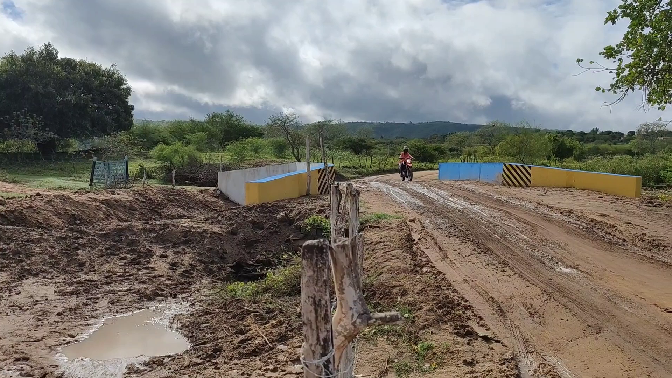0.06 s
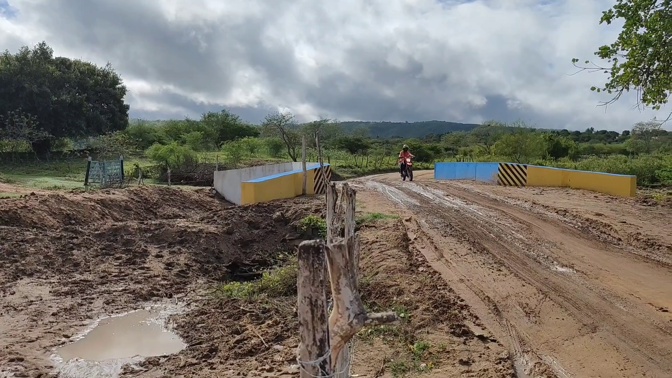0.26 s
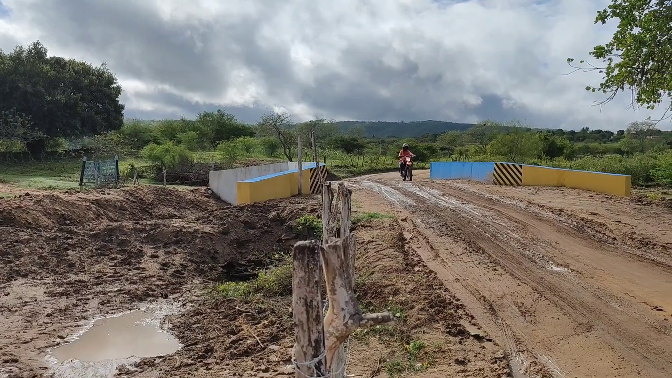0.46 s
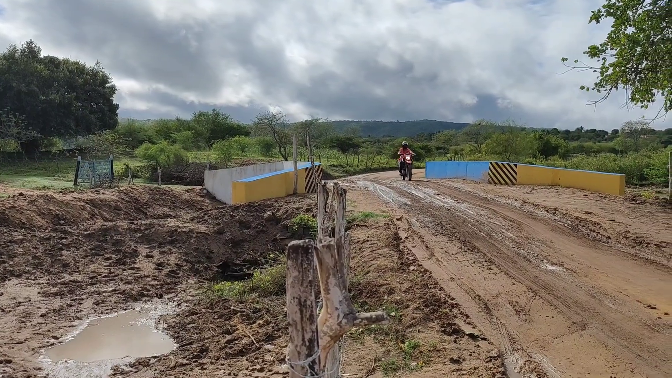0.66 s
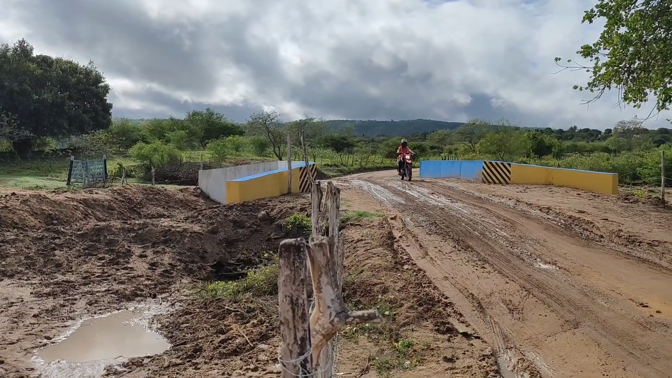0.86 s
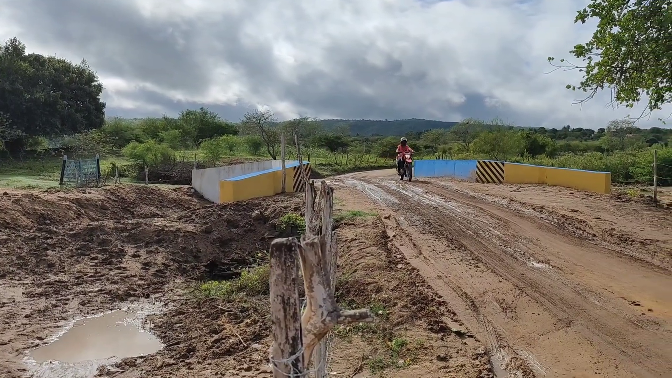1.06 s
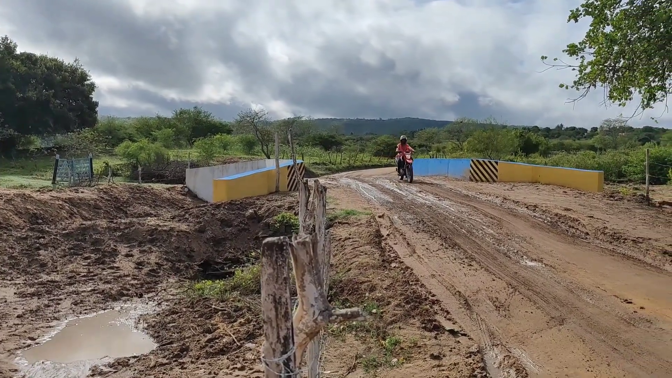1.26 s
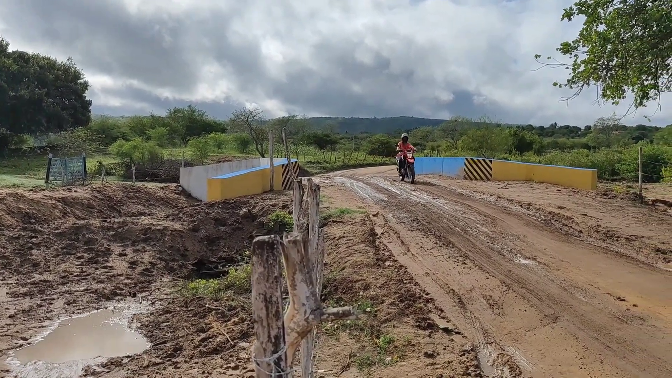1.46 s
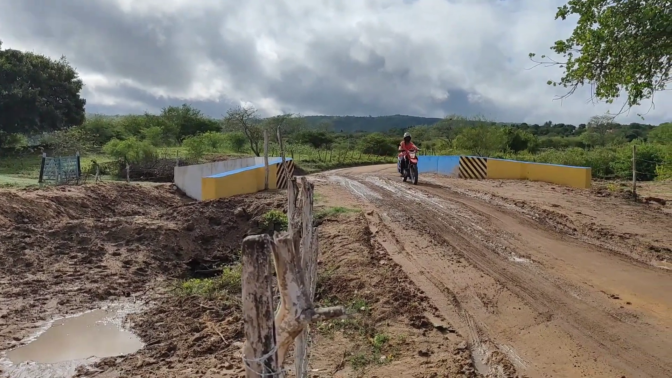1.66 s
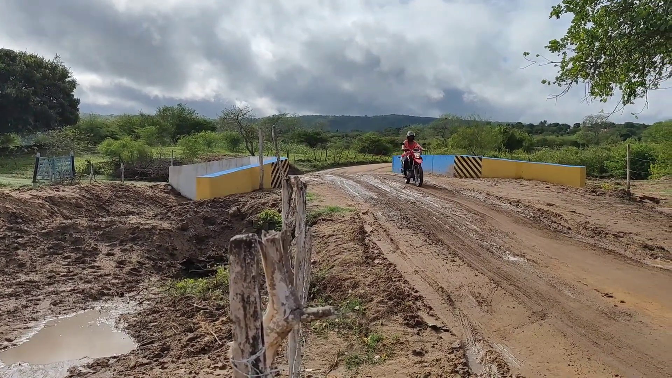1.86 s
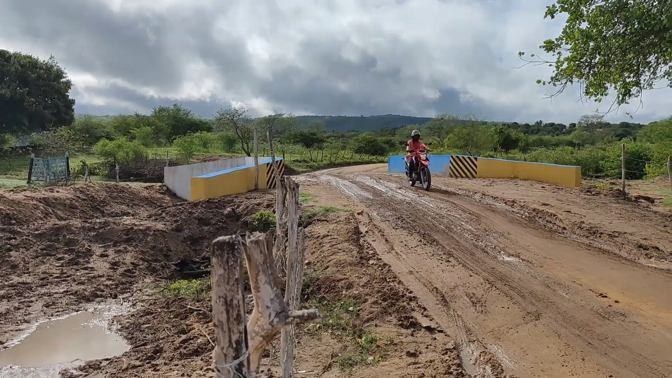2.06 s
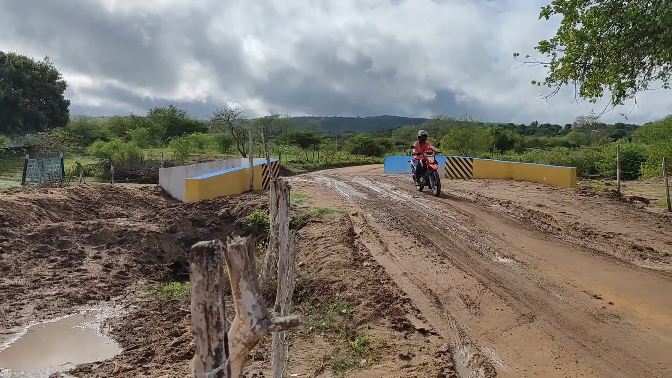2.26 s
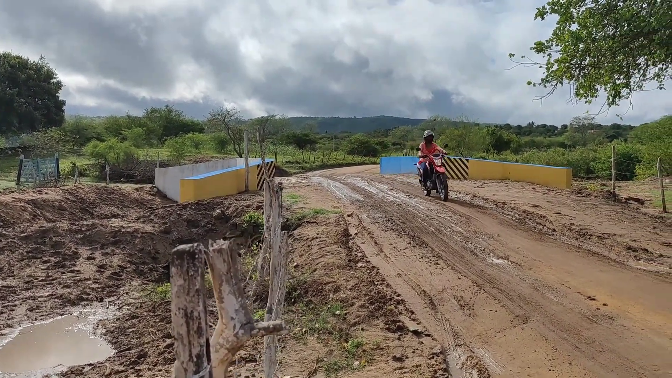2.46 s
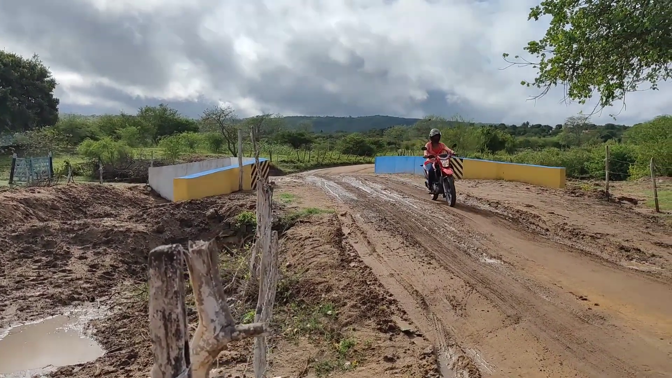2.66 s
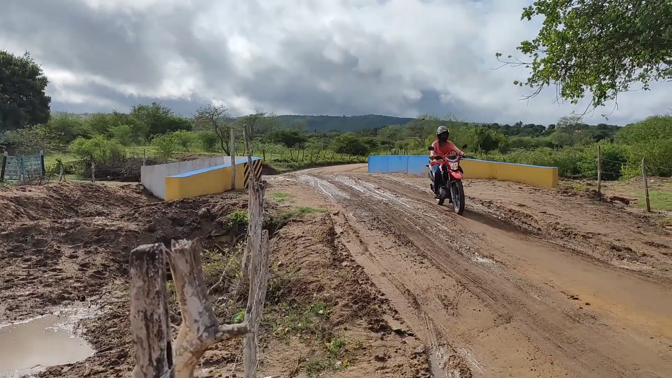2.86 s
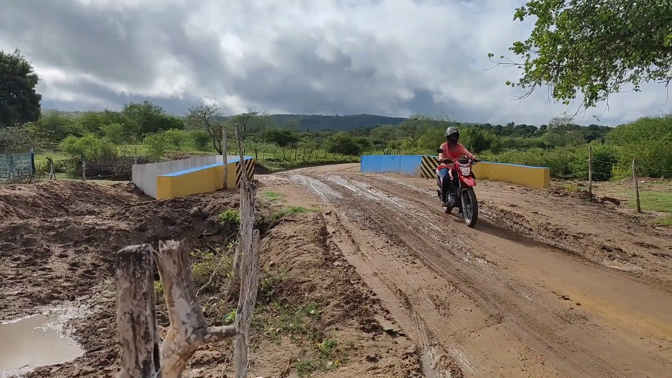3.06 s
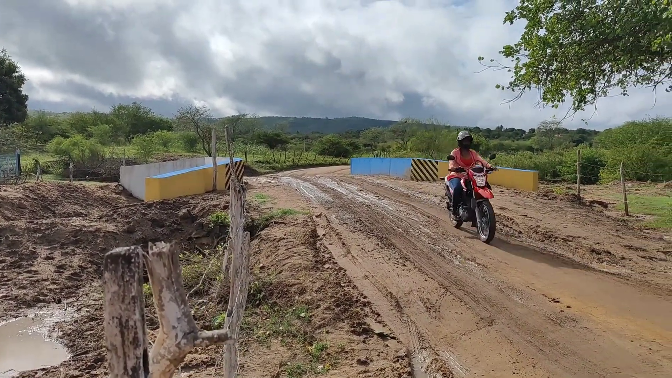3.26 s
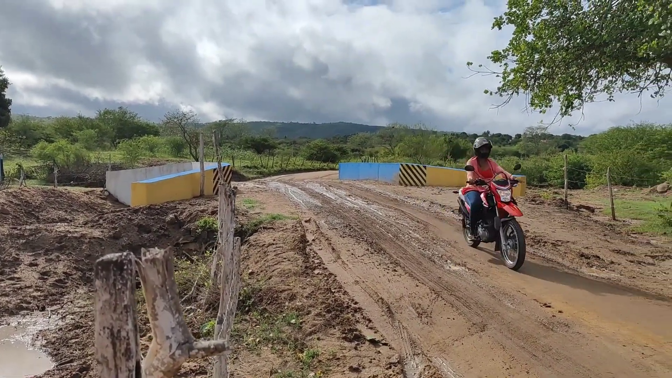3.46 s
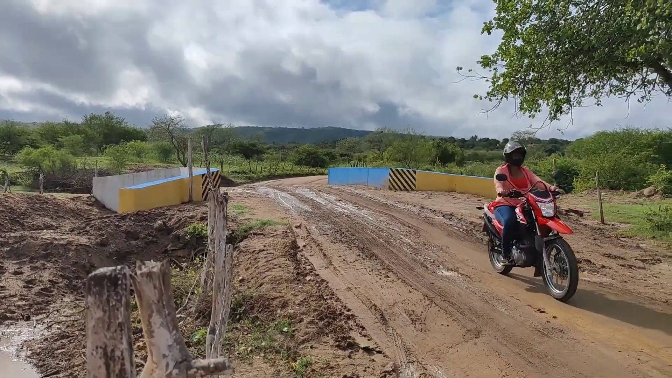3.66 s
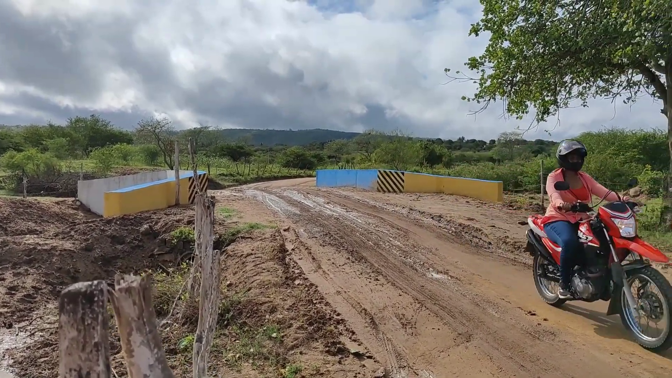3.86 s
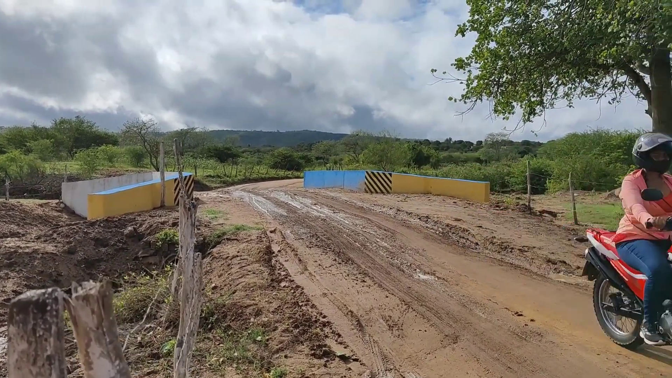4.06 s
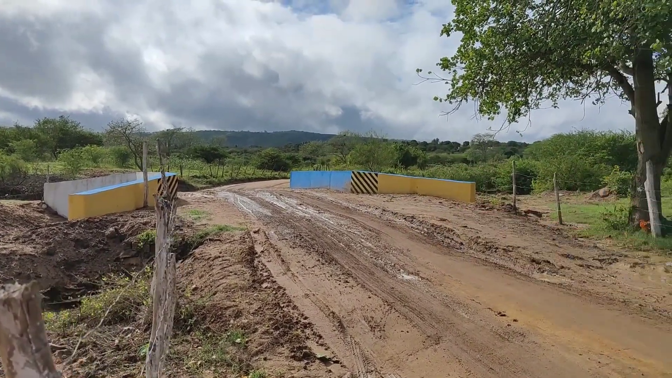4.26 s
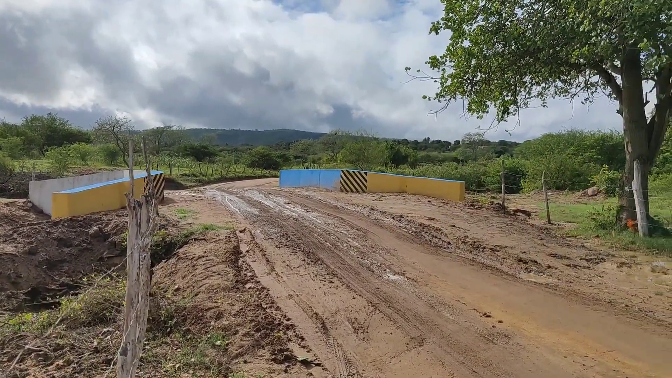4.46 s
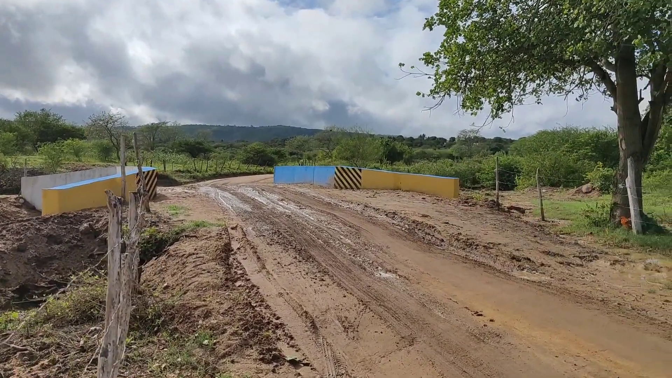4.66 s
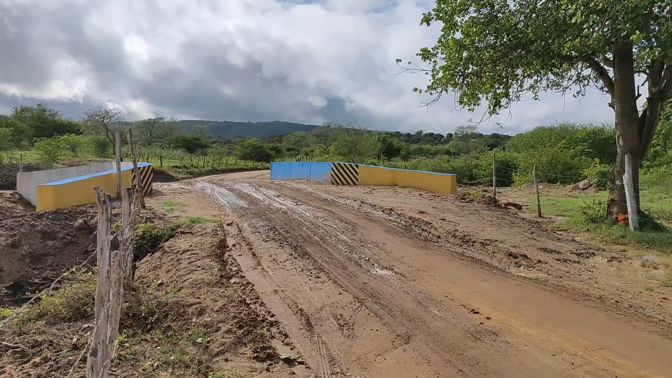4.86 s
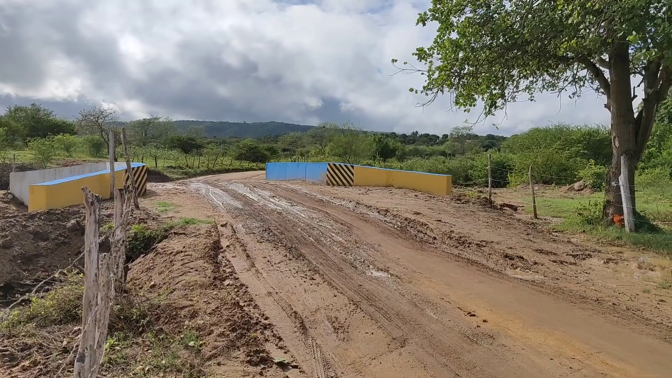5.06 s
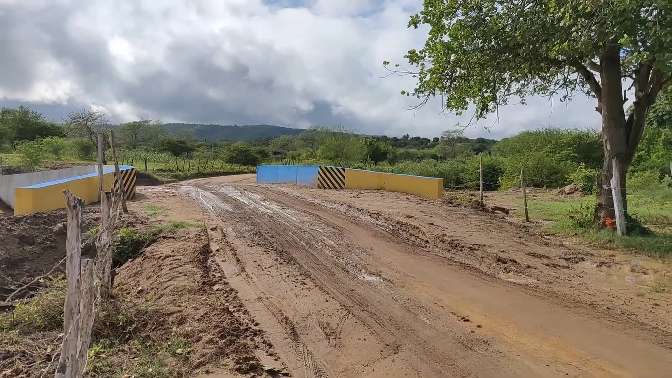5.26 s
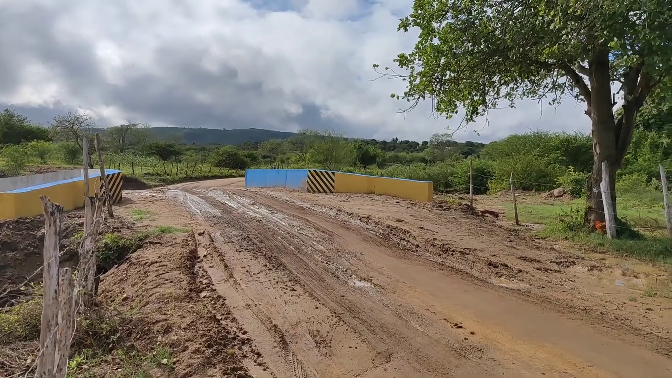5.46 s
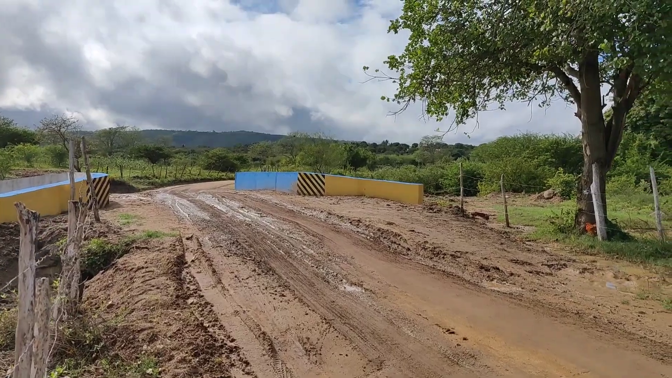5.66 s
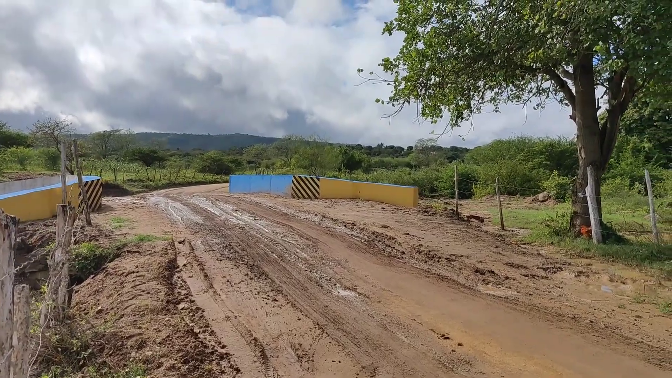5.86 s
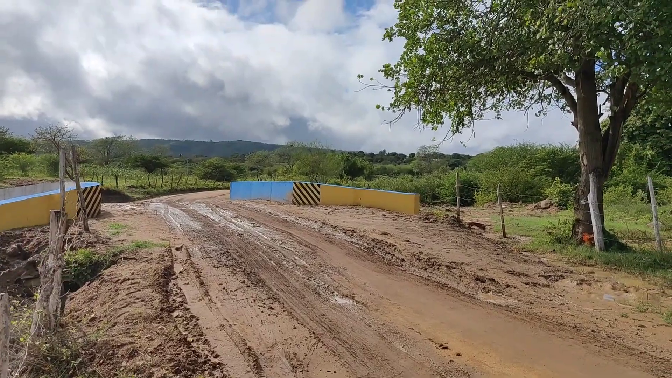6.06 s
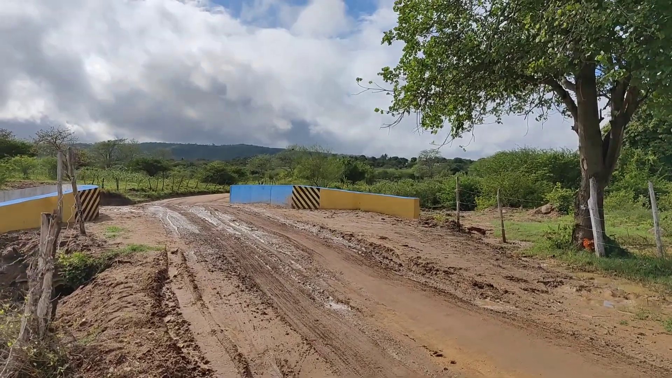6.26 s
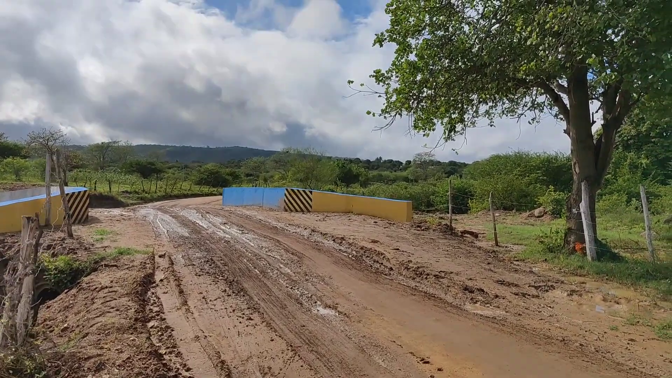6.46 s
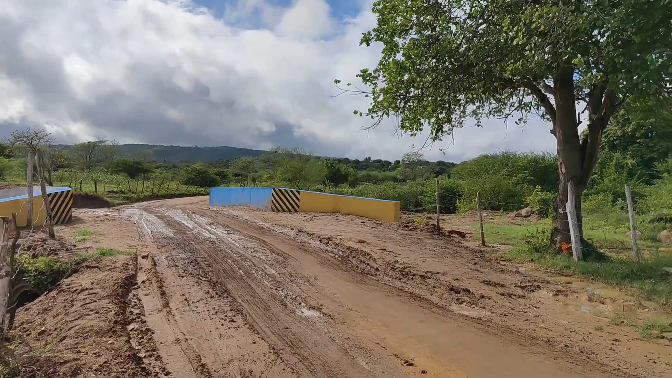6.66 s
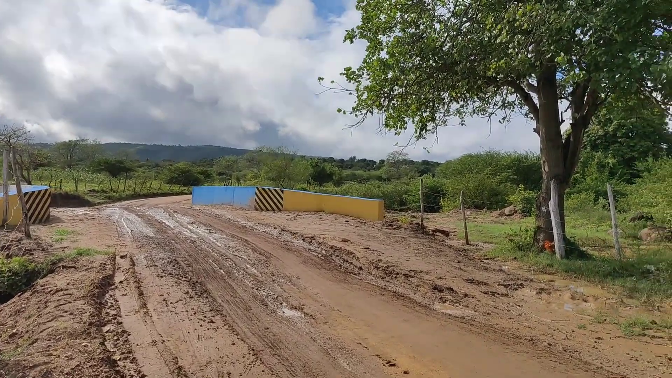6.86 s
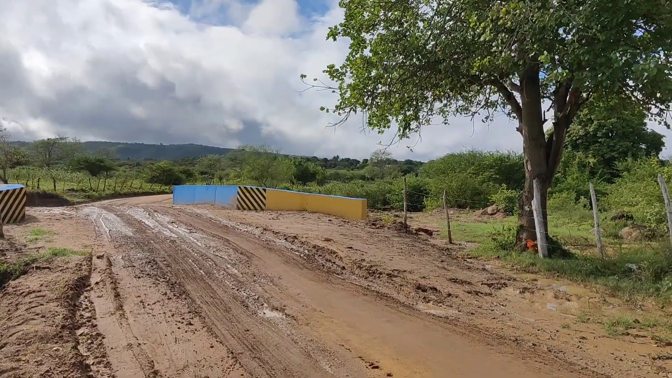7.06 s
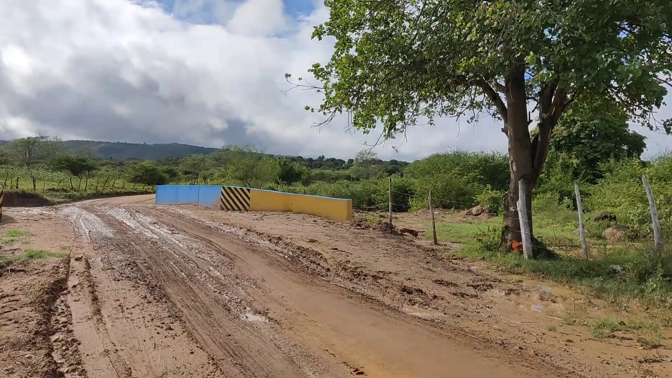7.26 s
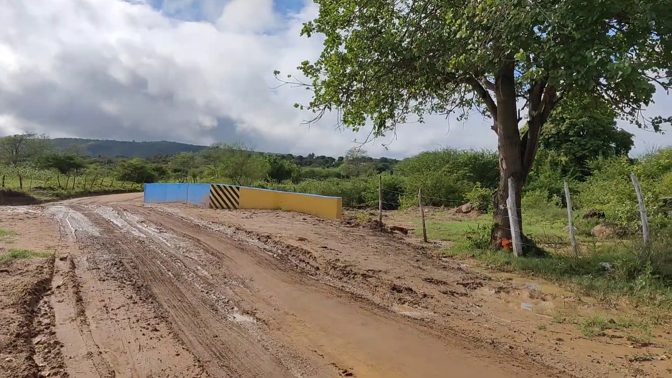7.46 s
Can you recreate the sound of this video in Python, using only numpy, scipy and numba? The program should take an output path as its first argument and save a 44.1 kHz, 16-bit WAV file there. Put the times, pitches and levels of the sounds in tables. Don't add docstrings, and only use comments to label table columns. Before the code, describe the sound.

Quiet open countryside, heard on a handheld stereo phone. A single-cylinder motorbike comes nearer, low thumping exhaust and gear hum growing; it lets off, shifts up, and accelerates past close by on the right with chain, valve and grit rasp. The tail pipe puffs and barks as it leaves, revs slowly rising while the sound thins. Low wind thuds buffet the microphones near the end, with a few tiny stone ticks.

```python
import sys
import numpy as np
from scipy import signal
from scipy.io import wavfile
from scipy.ndimage import uniform_filter1d, map_coordinates
from numba import njit

SR = 44100
rng = np.random.default_rng(int(sys.argv[2]) if len(sys.argv) > 2 else 0)


def pcm_store(signal):
    levels = np.round(np.clip(np.atleast_2d(signal), -1, 1) * 32767)
    wavfile.write(sys.argv[1], SR, levels.astype(np.int16).T)


def to_linear_factor(level_db):
    exponent = np.asarray(level_db, float) / 20
    return 10 ** exponent


N = 331411
KERB_M = 3.01

FACING_HZ = {"fins": (2070, 2100, 2280, 2180, 1950, 1990, 2010),
             "cover": (3400, 3300, 2820, 2670, 3160, 3140, 3100),
             "puff": (750, 765, 654, 595, 748, 626, 694), "case": (772, 1070, 970, 890, 830, 860, 840)}


def level(x, db):
    return x * to_linear_factor(db) / np.sqrt(np.mean(x ** 2))


def seconds():
    return np.arange(N) / SR


def curves(table):
    t_s, *columns = np.transpose(table)
    return [np.interp(seconds(), t_s, c) for c in columns]


@njit
def svf(x, hz, width):
    y, b, l = np.empty(len(x)), 0., 0.
    for i in range(len(x)):
        g, k = np.tan(np.pi * hz[i] / SR), width / hz[i]
        v = (b + g * (x[i] - l)) / (1 + g * (g + k))
        b, l, y[i] = 2 * v - b, l + 2 * g * v, k * v
    return y


def band(x, hz, width_hz):
    return svf(x, hz + np.zeros(N), 1. * width_hz)


def band_twice(x, hz, width_1_hz, width_2_hz):
    return band(band(x, hz, width_1_hz), hz, width_2_hz)


def ring(x, modes):
    return level(sum(to_linear_factor(db) * band(x, hz, w) for hz, w, db in modes), 0)


def late(x, samples):
    return map_coordinates(x, [np.arange(N) - samples], order=3, mode="nearest")


def noise():
    return rng.standard_normal(N)


def walk(rate_hz):
    k = int(SR / rate_hz)
    held = np.repeat(rng.standard_normal(N // k + 1), k)
    return 0.99 * uniform_filter1d(uniform_filter1d(held, k), k)[:N]


def road():
    speed_m_s, passes_s = 7.76, 4.54
    along_m = speed_m_s * (seconds() - passes_s)
    return np.hypot(along_m, KERB_M), np.degrees(np.arctan2(along_m, KERB_M))


def facing(values):
    aspects_deg = (-69, -41, 3.5, 41.5, 63.5, 77.5, 79.5)
    return np.interp(road()[1], aspects_deg, values)


def low_gear(start, top, clutch, bite=None):
    shift_s = (2.26, 2.35, 2.88, 3.0)
    bite = clutch if bite is None else bite
    return np.interp(seconds(), (0, *shift_s), (start, top, clutch, bite, 0))


def share_db(part):
    facing_db = {2: (-38, -35, -31, -29, -27.5, -27, -28), 3: (-41, -39, -32, -29, -32, -33, -42),
                 4: (-33, -34, -33, -29, -28, -27, -31), 5: (-33, -33, -32, -29, -27, -26.5, -34),
                 "rasp": (-31, -29, -26.5, -31, -36, -39, -48),
                 "clatter": (-15, -22, -10, -6.5, -9, -3, -9), "grit": (-13, -19, -19, -17, -21, -16, -11),
                 "fins": (-16, -13, -9, -10, -14, -3, 1.5), "bark": (-43, -38, -29, -25.5, -33, -27, -31),
                 "puff": (-37, -33, -35, -27.5, -33, -37, -35), "hum": (-47, -39, -47, -54, -55, -55, -55),
                 "case": (-41, -36, -44, -42, -51, -55, -46), "whine": (-60, -56, -53, -50, -43, -37, -37)}
    low_gear_db = {2: (-4, -1, 7, -7), 3: (7.5, 8.5, 10, 7.5), 4: (-1, -11, 4.5, -2),
                   5: (-5.5, -7, -2, -4.5), "rasp": (-2.5, 4, 1, -1.5), "clatter": (8, 5, 2.5, -1),
                   "grit": (6.9, 1.6, 1.3, 1.2), "fins": (12, -20, -44, -48), "bark": (6, 14.5, -9, -11),
                   "puff": (7.5, 7.5, 4.5, -2), "hum": (21.4, 12.6, 10.4, 3.7), "case": (4, 6.5, -6, 2),
                   "whine": (-7, -12, -7, -7)}
    return facing(facing_db[part]) + low_gear(*low_gear_db[part])


def heard_db(part):
    return share_db(part) - 20 * np.log10(road()[0] / KERB_M)


def crank(hz):
    return .56 + np.cumsum(hz) / SR


def exhaust(turns, behind):
    # [multiple, neighbour, front level/dB, rear level/dB re it]
    overtones = [(1, 2, -13, -13), (6, 5, -8, -6), (7, 5, -8, -11), (8, 5, -8, -18), (9, 5, -11, -21),
                 (10, 5, -14, -17), (11, 5, -18, -15), (12, 5, -19, -15)]
    meeting = {2: (-.22, -.12, -.05, -.05, -.08, -.1, -.08), 3: (.83, .45, .3, .27, .15, .05, 0),
               4: (.08,) * 7}
    db = {k: heard_db(k) for k in range(2, 6)}
    for k, near, front_db, rear_db in overtones:
        db[k] = db[near] + front_db + behind * (rear_db - front_db)
    db[7] = db[7] + low_gear(6, 2, 0)
    db[8] = db[8] + low_gear(4, 2, 0)

    delay, spread = low_gear(0, 0, -.35), low_gear(.11, .11, 0)
    skew = facing((.55, .55, .56, .55, .52, .51, .53)) + low_gear(.05, .05, -.24)
    meet = {k: facing(v) * (1 - low_gear(1.0, 0.92, 1)) for k, v in meeting.items()}
    note = 0
    for k in db:
        uneven_db = .8 * walk(12) + low_gear(3, 3, .5, .5) * walk(3)
        phase = k * (turns - delay) + skew + meet.get(k, 0) + spread * (k - 4) ** 2
        note = note + to_linear_factor(db[k] + uneven_db) * np.cos(2 * np.pi * phase)
    dip = 1 - .75 * np.exp(-((seconds() - 2.3) / .05) ** 2)

    flutter = ring(noise(), [(70.5, 13.0, -1.5), (120, 185, 0.43), (175, 90, 2)])
    flutter = flutter + to_linear_factor(-7.5 - 150 * behind) * ring(noise(), [(280, 140, 0)])
    flutter_db = uniform_filter1d(db[4] + db[5], SR // 2) / 2
    flutter_db = flutter_db - 0.5 - 1.0 * behind + low_gear(4.8, 13.6, 0.34)
    return np.sqrt(2) * dip * note + to_linear_factor(flutter_db) * flutter


def tail_pipe(turns, behind):
    # [f/Hz, width/Hz, level/dB]
    pipe_modes = [(363, 100, 13), (424, 63, 13.5), (550, 16, 7.5)]
    firings = np.diff((turns + .17).astype(int), prepend=0)
    knocks = level(firings * to_linear_factor(1.5 * walk(30)), 0)
    puffs = np.exp(-(((turns + .5) % 1 - .51) / .15) ** 2)
    gate = facing((1.6, 1.3, .9, .6, .6, 1.2, 1.6)) + puffs
    gas = gate / np.sqrt(uniform_filter1d(gate ** 2, SR // 5)) * noise()

    calm = facing((1, 1, 1, .9, .7, .6, .85))
    struck = facing((.5, 0.45, 0.85, 1.5, 0.8, 0.95, 0.8)) * knocks + calm * gas
    bark = ring(band(band(struck, 447, 270), 566, 330), pipe_modes)
    blown = gas + 0.33 * behind * late(knocks, 0.00399 * SR)
    puff = level(band_twice(blown, facing(FACING_HZ["puff"]), 126, 186), 0)
    return to_linear_factor(heard_db("bark") - 5.5) * bark + to_linear_factor(heard_db("puff") - 2.0) * puff


def running_gear(turns, metres, top):
    # [f/Hz, width/Hz, level/dB]
    casing_modes = [(1900, 46, 7.5), (2220, 440, 5.5), (3060, 1200, 2), (3150, 2700, 2.5),
                    (3980, 770, -6.5), (5820, 3700, 7), (7410, 800, -1.5)]
    cover_db = (-19.5, -14.5, -11.5, -14, -17.5, -33, -19)
    low_db, grit_db, fin_db = share_db("clatter"), share_db("grit"), share_db("fins")
    fin_hz, cover_hz = facing(FACING_HZ["fins"]), facing(FACING_HZ["cover"])
    hollow = facing((.7, .45, .2, .25, .35, .25, .2))
    shade = facing((0.11, 0.32, 0, 0.47, 0.59, 0.51, 0))
    cycle = np.cos(2 * np.pi * (turns - .02))
    valve = np.exp(-((turns - .62) % 1) / .14)
    beat = 1 + facing((0.03, 0.06, 0.12, .25, 0.3, 0.3, 0.15)) * cycle
    beat = beat + facing((.25, .8, .25, .1, 0, 0, 0)) * valve
    strength = to_linear_factor(heard_db("rasp")) * level(beat, 0) * to_linear_factor(.6 * walk(16))
    far = np.clip(metres / 12, .15, 1)
    rattle = to_linear_factor(2.2 * np.array([walk(17) for _ in range(len(casing_modes) + 2)]))

    ways = []
    for way in range(3):
        bursts = np.minimum(rng.exponential(size=N // 20 + 1), 4).repeat(20)[:N]
        hits = noise() * to_linear_factor(1.6 * bursts)
        clatter = ring(band(hits, 1055, 700), [(930, 230, -1.0), (1390, 62, 1.0), (1790, 320, 6.0)])
        low = to_linear_factor(low_db) * rattle[-1] * clatter
        fins = to_linear_factor(fin_db) * level(band_twice(hits, fin_hz, 750, 1200), 0)
        fins = fins + to_linear_factor(facing(cover_db)) * level(band_twice(hits, cover_hz, 600, 1000), 0)
        modes = zip(rattle, casing_modes)
        casing = level(sum(r * to_linear_factor(db) * band(hits, hz, w) for r, (hz, w, db) in modes), 0)
        grit = level(band(band(hits, 9670, 5600), 16400, 11400), 0)
        grit = to_linear_factor(grit_db) * rattle[-2] * grit
        grit = grit * (far if way == 0 else np.sqrt(1 + 1.3 * (1 - far ** 2)))
        high = casing + grit - 0.071 * band(casing, 2710, 170)
        high = high - hollow * (band(high, 4750, 750) + .5 * band(high, 10800, 1500))
        high = high - shade * band(high, 11900, 10400)
        ways.append(((strength + top) * (low + fins), (strength + .45 * top) * high))
    return ways


def gears(hz, turns):
    # [t/s, teeth met per firing, change level/dB]
    hum_track = [(0, 32.9, 0), (1.128, 32.9, 0), (1.137, 32.9, 6), (1.155, 32.9, -3), (1.175, 32.9, 6),
                 (1.19, 33, 0), (1.3, 33.6, 0), (1.39, 31.6, 3), (1.6, 34.7, 1), (1.82, 33.4, 0),
                 (2.02, 31.4, 1), (2.15, 31, -3), (2.33, 33, -9), (2.41, 34, 4), (2.57, 34, 6),
                 (2.63, 33.8, -8), (2.86, 35, -8), (2.9, 35, 6), (2.95, 38.5, 6), (3.02, 36, 0),
                 (3.3, 33.2, 0), (7.51, 33.2, 0)]
    whine_order, whine_fades_s = 47.8, 5.9
    order, change_db = curves(hum_track)
    hum_hz, hum_db = order * hz, heard_db("hum") + change_db
    swell = 1 + .3 * np.cos(2 * np.pi * (turns - .2))

    teeth = np.sqrt(2) * np.sin(2 * np.pi * np.cumsum(hum_hz) / SR + 1.1 * walk(40))
    hum = .7 * teeth + level(band_twice(noise(), hum_hz, 60, 110), -3)
    case = level(band_twice(noise(), facing(FACING_HZ["case"]), 350, 340), 0)
    whine = np.sqrt(2) * np.sin(2 * np.pi * whine_order * turns + 2.2 * walk(50))
    whine = whine * to_linear_factor(2.5 * walk(25)) * swell ** 2
    whine_db = heard_db("whine") - 30 * np.clip((seconds() - whine_fades_s) / 0.5, 0, 1) ** 2
    return swell * (to_linear_factor(hum_db) * hum + to_linear_factor(heard_db("case")) * case + to_linear_factor(whine_db) * whine)


def jolts():
    # [t/s, peak level/dB, thud share/dB, length/s]
    bumps = [(0.966, -52, 7, 0.0095), (1.14, -71, -7, 0.0091), (1.382, -51, -6, 0.021),
             (1.66, -43, -5, 0.05), (1.872, -38, 10, 0.014), (2.107, -43, -5, 0.0063),
             (2.151, -35, 9, 0.0093), (2.927, -44, 12, 0.052), (3.005, -32, 8.5, 0.025),
             (4.222, -41, 21, 0.011), (4.548, -19.5, -28, 0.0051), (5.363, -39, -3, 0.018),
             (5.87, -52, 28, 0.025), (6.98, -50, 22, 0.02)]
    t, top, thud = seconds(), 0, 0
    for t_s, db, thud_db, length_s in bumps:
        shape = np.exp(-((t - t_s - .008) / length_s) ** 2)
        top = top + to_linear_factor(db - 4.5) * shape
        thud = thud + to_linear_factor(db + thud_db - 14.5) * shape
    return top, thud


def clank():
    # [t/s, length/s, f/Hz, level/dB]
    panel = (7.035, 0.18, 1700, -61)
    # [t/s, level/dB, f/Hz]
    stones = [
        (6.974, -50, 5500),
        (6.987, -42, 3000),
        (6.988, -45, 6500),
        (7.035, -49, 2100),
    ]
    t = seconds()
    start_s, length_s, panel_hz, panel_db = panel
    rattle = level(band_twice(noise(), panel_hz, 120, 200), panel_db)
    rattle = rattle + level(band(noise(), 4100, 6500), -59.0)
    out = rattle * (t > start_s) * np.exp(-((t - start_s) / length_s) ** 2)
    for t_s, db, hz in stones:
        decay = (t > t_s) * np.exp(-np.abs(t - t_s) / .0025)
        out = out + level(band(noise(), hz, hz / 3), db) * decay
    return out


def wind():
    breeze_db = (-51, -58.5)
    # [t/s, length/s, left level/dB, right level/dB]
    gusts = [(0.548, 0.018, -61, -39), (1.02, 0.017, -41, -60), (4.218, 0.03, -37, -55),
             (6.126, 0.0093, -54, -25), (6.232, 0.026, -41, -26), (6.41, 0.15, -34.5, -32),
             (6.55, .03, -27.5, -39), (6.637, 0.044, -23.5, -24), (6.768, 0.082, -34, -38),
             (6.928, 0.08, -81, -44), (7.075, 0.033, -39, -60), (7.28, 0.017, -35, -34),
             (7.333, 0.012, -52, -24), (7.446, 0.044, -49, -37.5)]
    lulls_db = 3.5 * np.array([walk(5), walk(5)])
    t, strength = seconds(), to_linear_factor(np.array(breeze_db)[:, None] + lulls_db)
    for t_s, length_s, *db in gusts:
        strength = strength + to_linear_factor(np.array(db))[:, None] * np.exp(-((t - t_s) / length_s) ** 2)
    eddies = []
    for _ in range(2):
        rumble = band(band(band(noise(), 86, 176), 98, 220), 103, 240)
        eddy = ring(rumble, [(37.7, 8.6, 20.5), (73, 140, 2), (137, 39, -27)])
        eddies.append(eddy / np.sqrt(uniform_filter1d(eddy ** 2, SR // 15)))
    return strength * eddies


def hush():
    # [f/Hz, level/dB per Hz]
    spectrum = [(40, -33), (130, -44), (300, -16.5), (1200, -37), (2200, -20), (4300, -35), (7000, -26.5),
                (15500, -62)]
    out, swell, (freqs_hz, dbs) = 0, walk(0.41), np.transpose(spectrum)
    for hz in 45 * 2 ** np.arange(0, 8.6, .5):
        mid, side = (band(noise(), hz, hz / 3) for _ in range(2))
        db = np.interp(np.log(hz), np.log(freqs_hz), dbs) + 0.89 * swell + 0.87 * walk(11)
        out = out + to_linear_factor(db) * (mid + min(hz / 3900.0, 1) * side * np.array([[1], [-1]]))
    return level(out, -57)


def ground(bass, metres, behind):
    notch_hz = 378 + 1210 / metres
    share = 0.74 * np.clip((metres - KERB_M) / 6.1, 0, 1) * (1 - behind)
    bass = bass - share * band(bass, notch_hz, 177)
    return bass - facing((0.049, 0.087, 0.18, 0.83, 0.52, 0, 0)) * band(bass, 274, 160)


def scene():
    # [t/s, f/Hz]
    firing = [(0.0, 23.12), (0.75, 24.56), (1.35, 24.72), (1.65, 26.45), (2.25, 27.92), (2.4, 26.12),
              (2.7, 19.7), (2.85, 19.7), (3.75, 24.09), (4.05, 24.38), (4.5, 26.78), (4.8, 25.82),
              (5.25, 27.11), (6.45, 29.61), (7.51, 30.78)]
    # [t/s, left port lag/samples]
    bearing = [(0, 3.8), (2.3, 5.96), (3.9, 7.1), (4.3, 15), (4.65, 23.3), (5, 17.3), (5.4, 12.8),
               (6.4, 9.3), (7.51, 10.2)]
    (hz,), (lag,), metres = curves(firing), curves(bearing), road()[0]
    behind = .5 + .5 * np.tanh((seconds() - 4.5) / 0.28)
    turns = crank(hz)
    top, thud = jolts()
    bass = exhaust(turns, behind) + tail_pipe(turns, behind) + gears(hz, turns)
    bass = bass + thud * level(band(band(noise(), 170, 155), 164, 310), 0)
    bass = ground(bass, metres, behind)

    (low, direct), (low_left, high_left), (low_right, high_right) = running_gear(turns, metres, top)
    half, straight, scattered = lag / 2, .77, .64
    close = 1 - np.clip(metres / 12, .15, 1)
    direct = direct - close * band(direct, 8000, 10000)
    high_left = high_left + .45 * close * band(high_left, 8000, 10000)
    high_right = high_right + .45 * close * band(high_right, 8000, 10000)
    high_left = straight * late(direct, half - 3.0) + scattered * high_left
    high_left = high_left - 0.13 * band(high_left, 4600, 2200)
    rasp_left = late(low, half) + 0.22 * low_left + high_left
    rasp_right = late(low + straight * direct, -half) + 0.32 * low_right + scattered * high_right
    left = to_linear_factor(0.45) * late(bass, half) + to_linear_factor(1.46) * rasp_left
    right = late(bass, -half) + to_linear_factor(5.0) * rasp_right
    return np.array([left, right]) + wind() + hush() + clank()


def band_limit(x):
    return signal.sosfilt(signal.butter(12, 15830, fs=SR, output="sos"), x)


def record(dry):
    x = signal.sosfilt(signal.butter(2, 24, "high", fs=SR, output="sos"), dry)
    x = signal.sosfilt(signal.ellip(16, .2, 90, 15790, fs=SR, output="sos"), x)
    return band_limit(x)


dry = scene()
out = record(dry)
pcm_store(out)
```